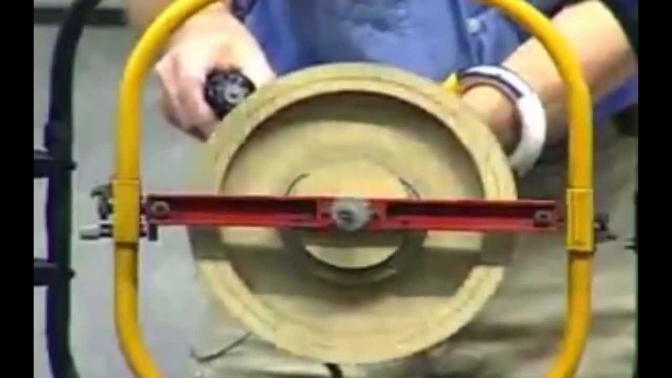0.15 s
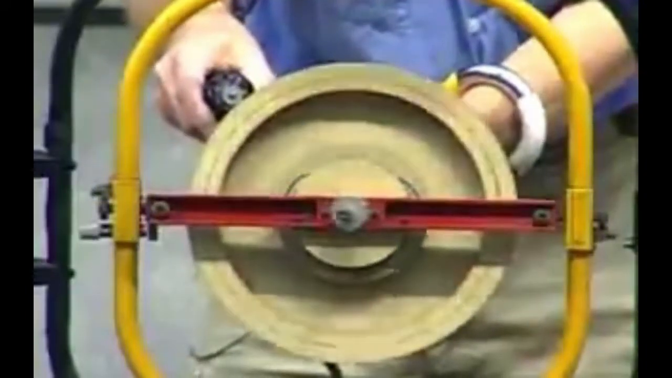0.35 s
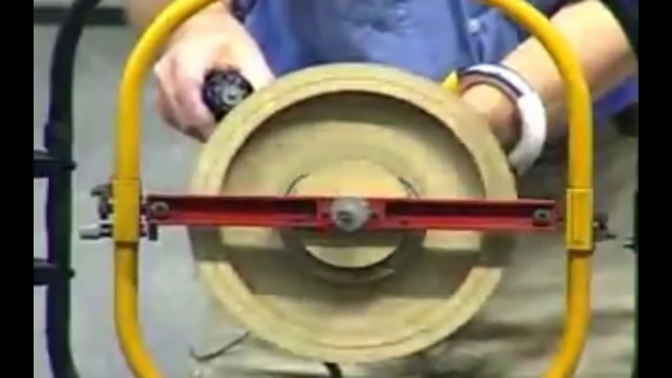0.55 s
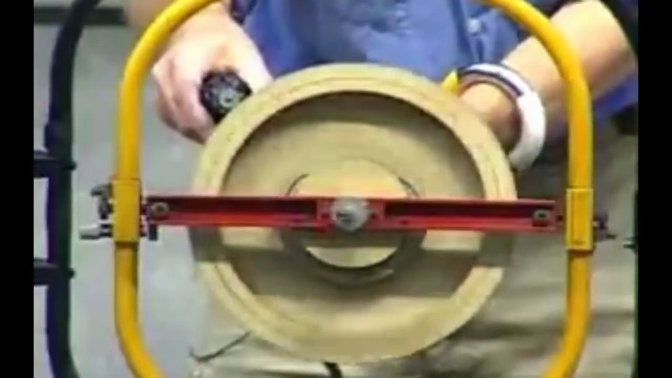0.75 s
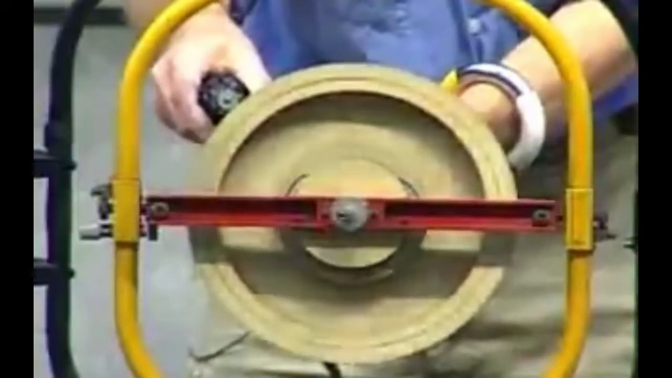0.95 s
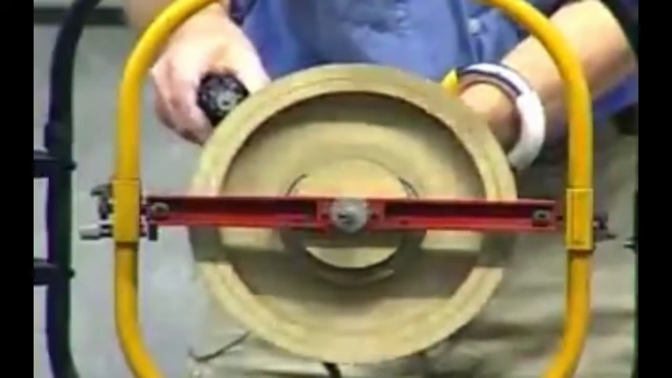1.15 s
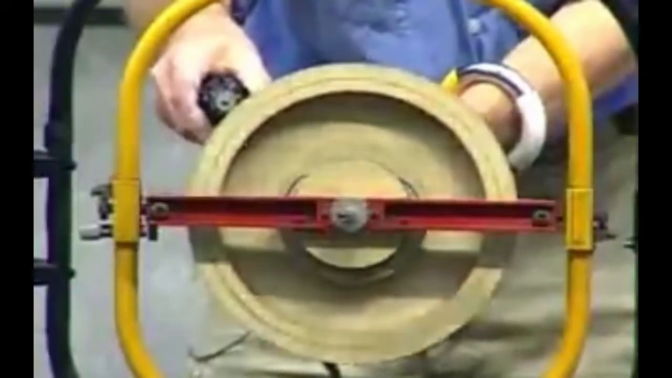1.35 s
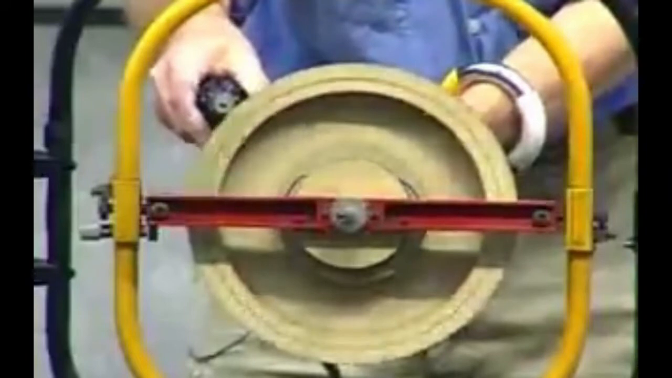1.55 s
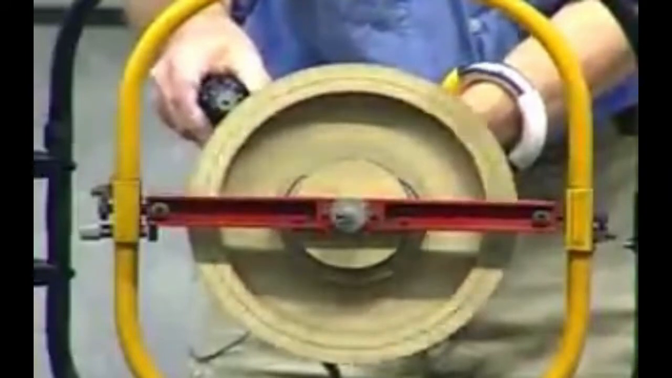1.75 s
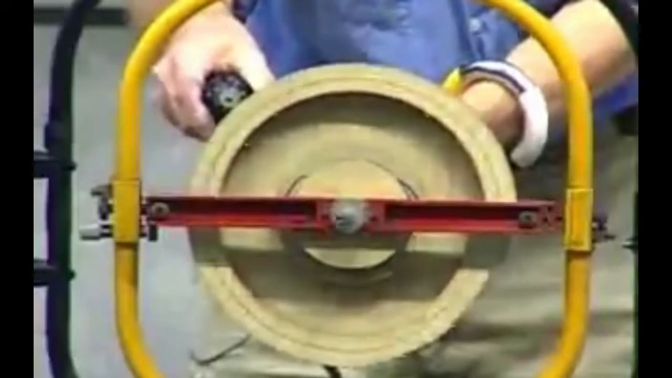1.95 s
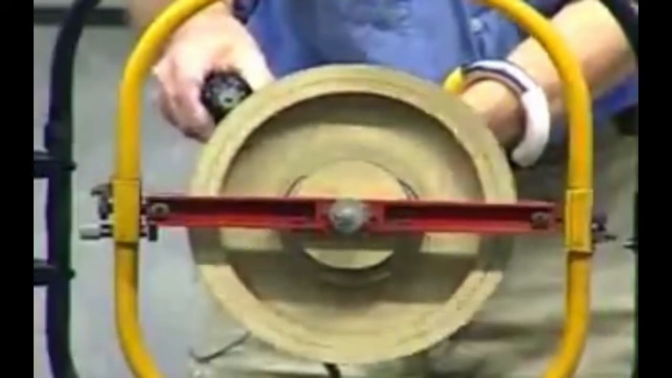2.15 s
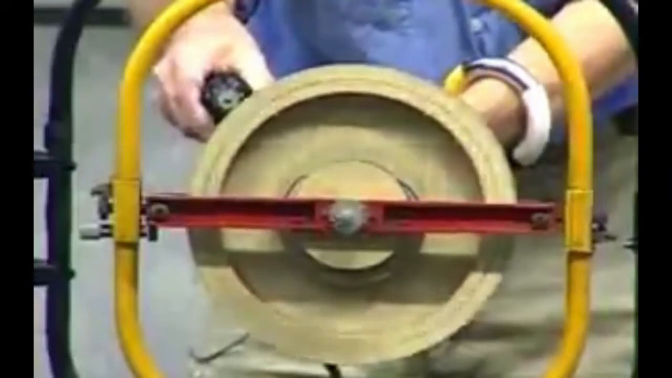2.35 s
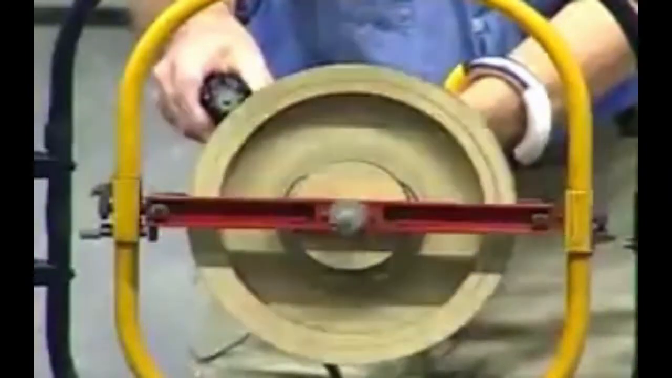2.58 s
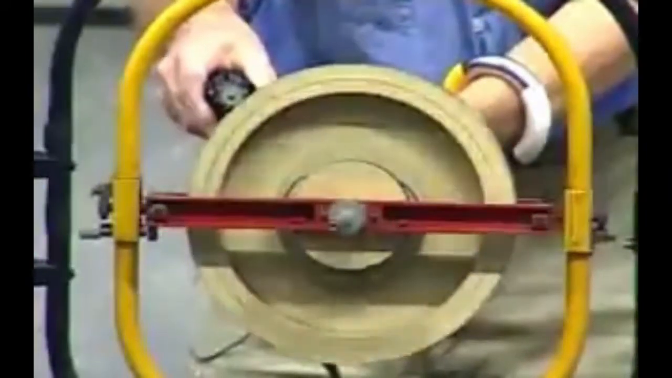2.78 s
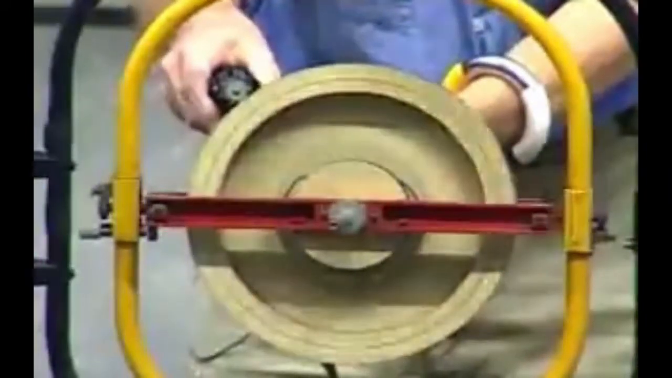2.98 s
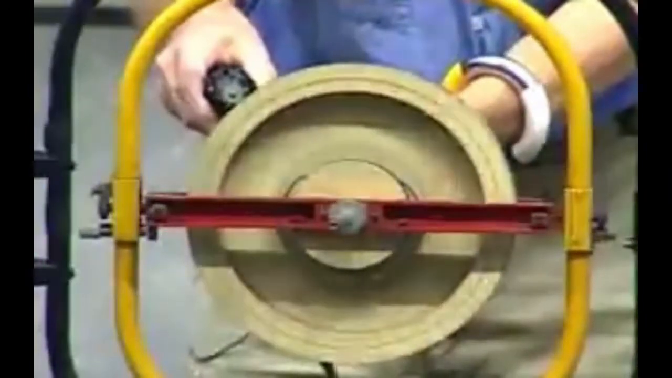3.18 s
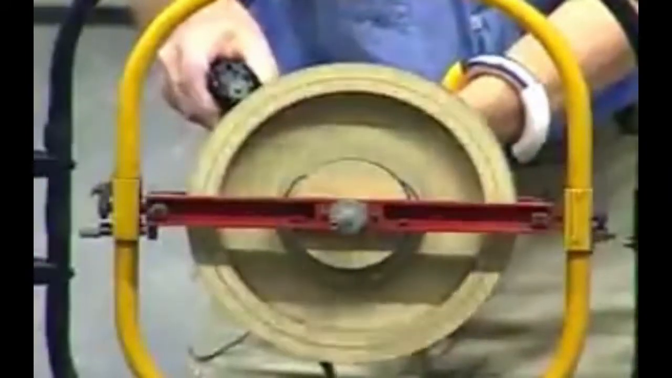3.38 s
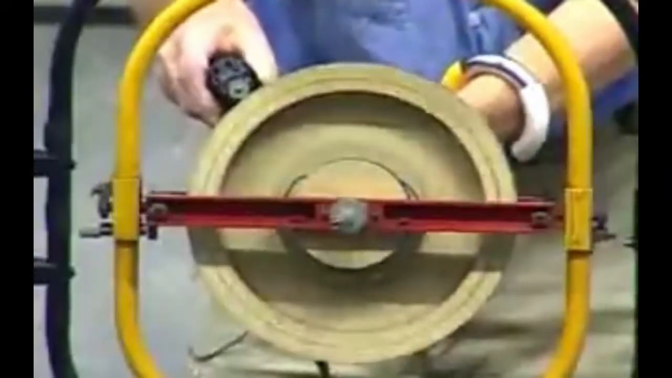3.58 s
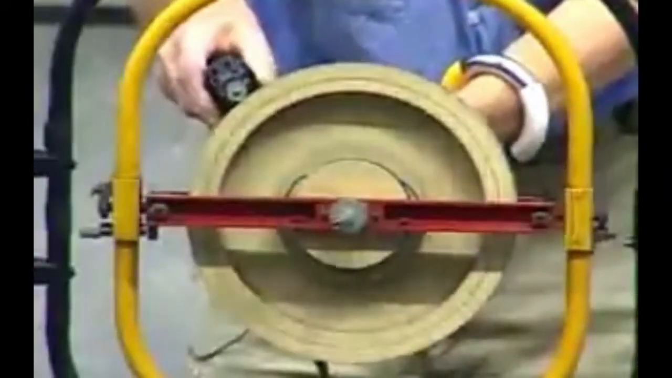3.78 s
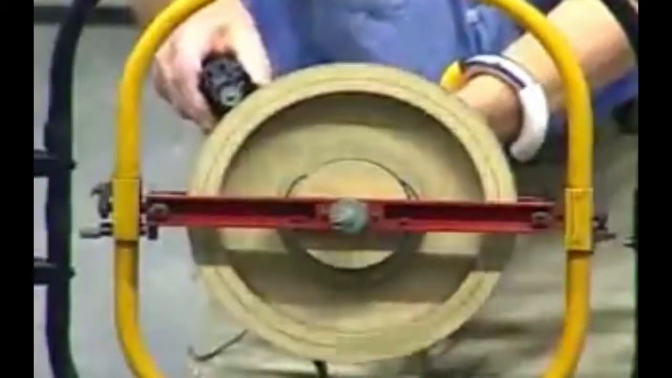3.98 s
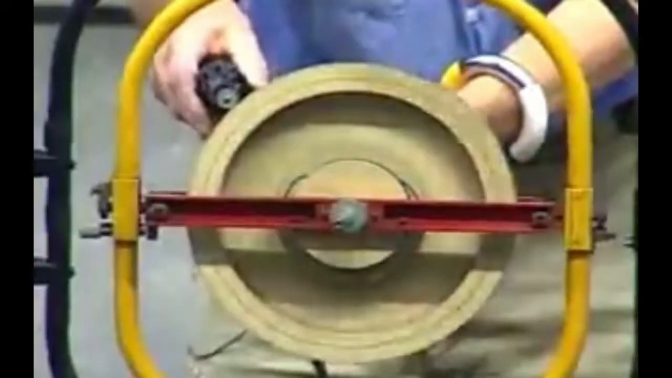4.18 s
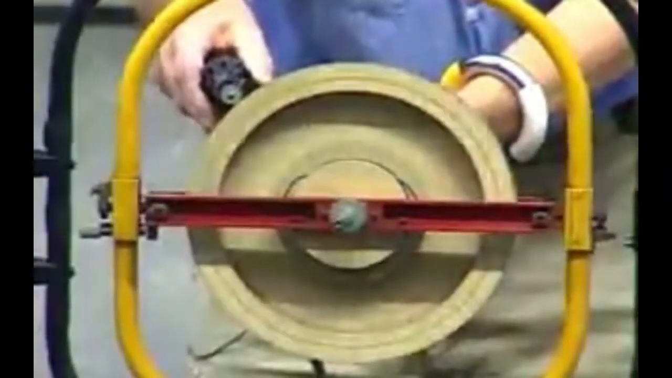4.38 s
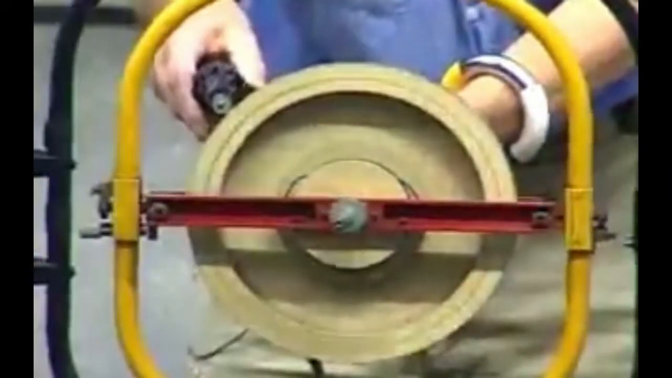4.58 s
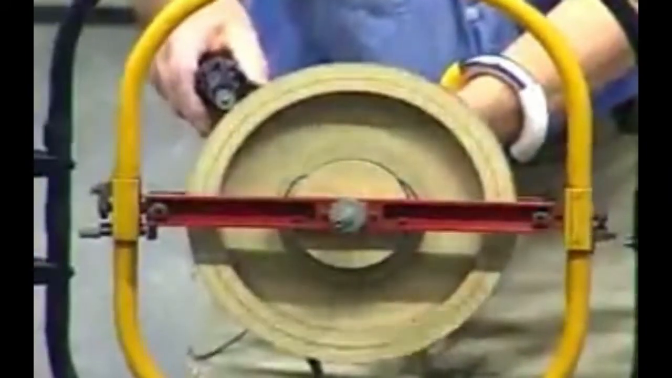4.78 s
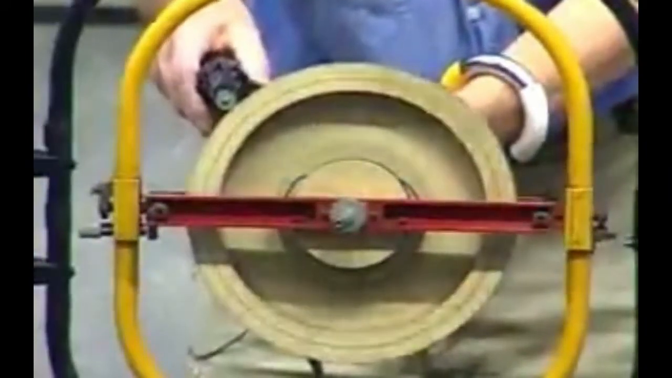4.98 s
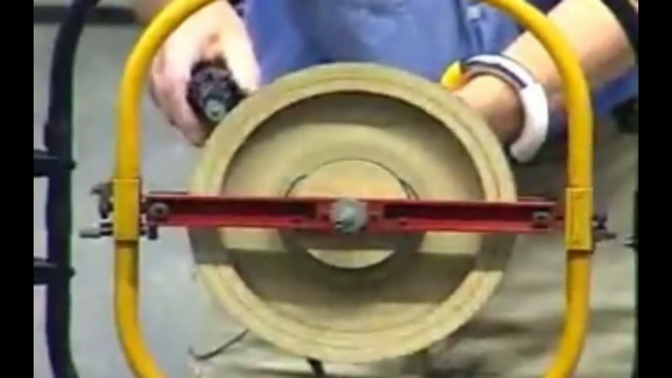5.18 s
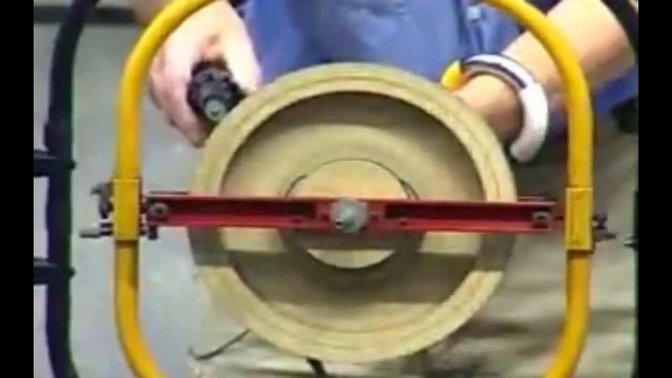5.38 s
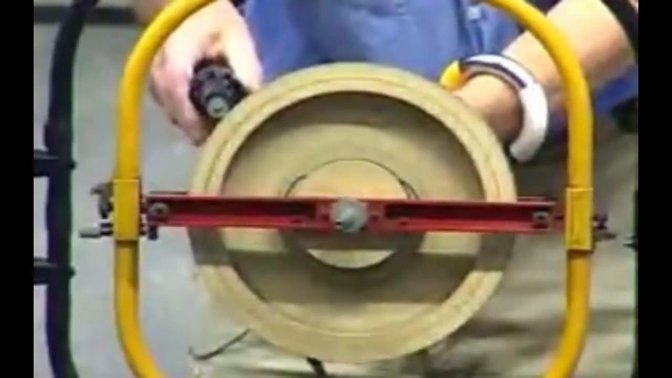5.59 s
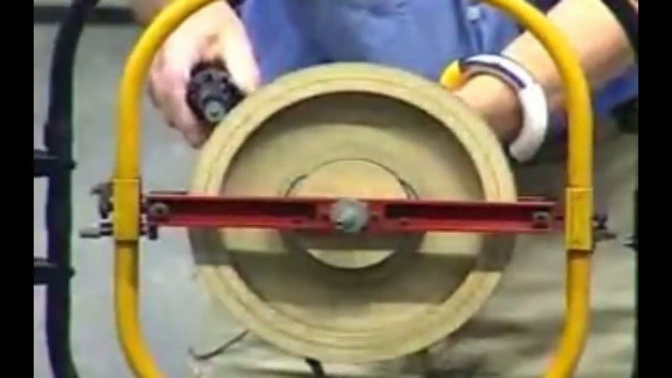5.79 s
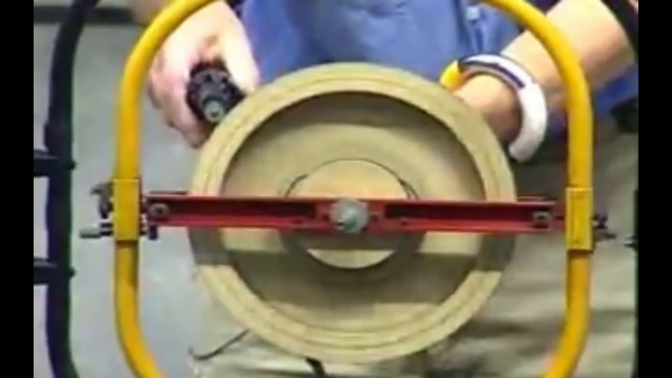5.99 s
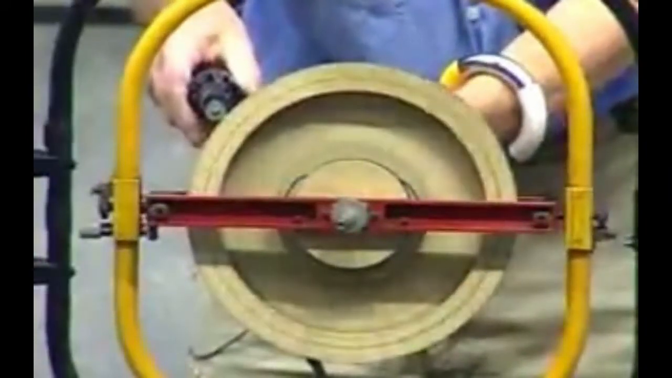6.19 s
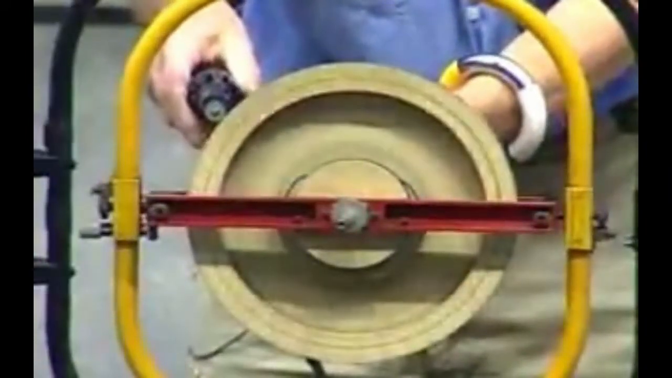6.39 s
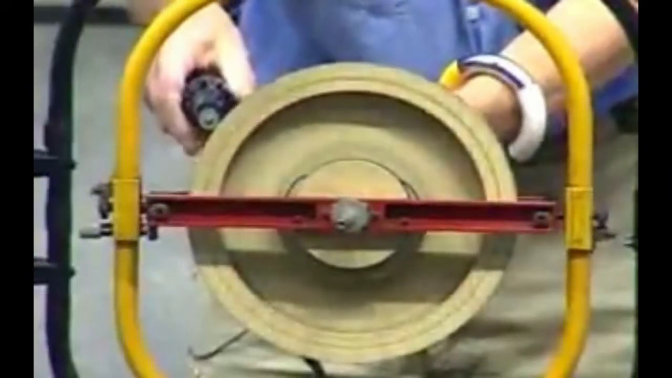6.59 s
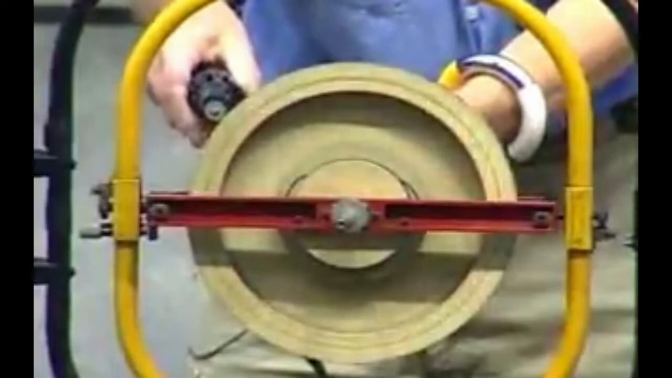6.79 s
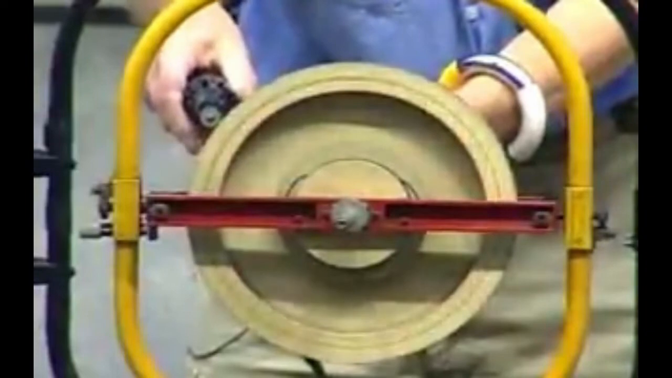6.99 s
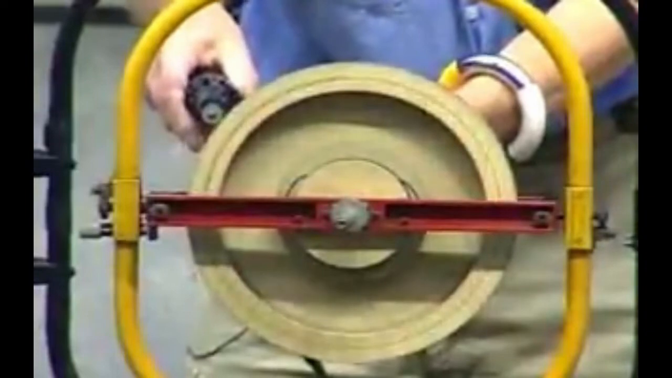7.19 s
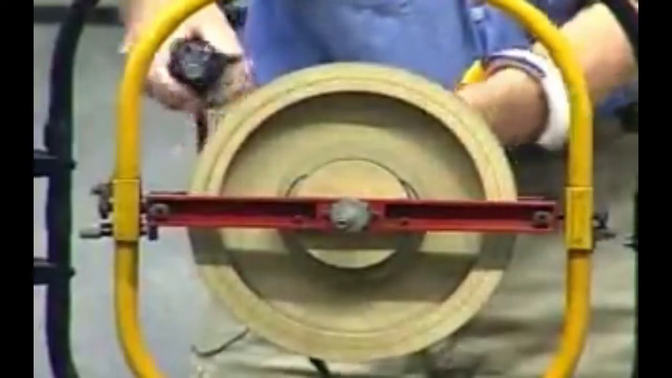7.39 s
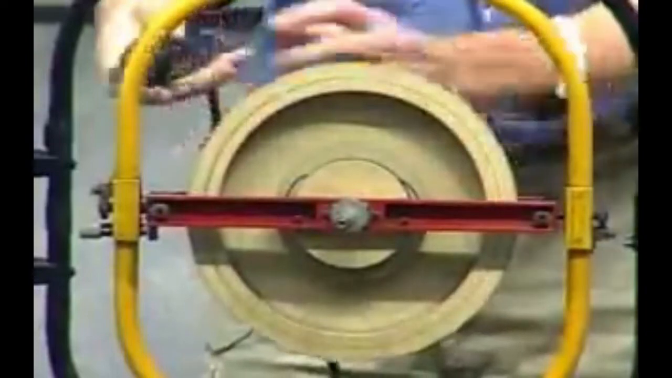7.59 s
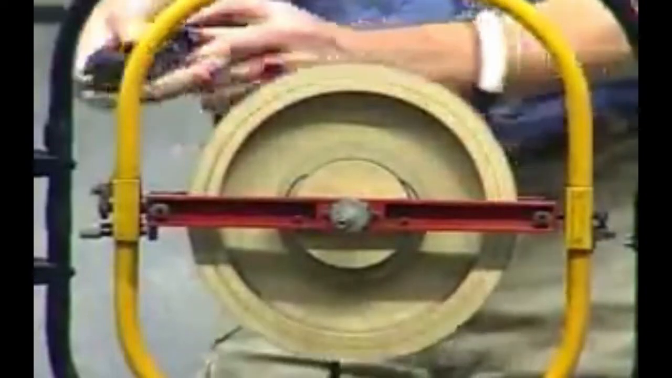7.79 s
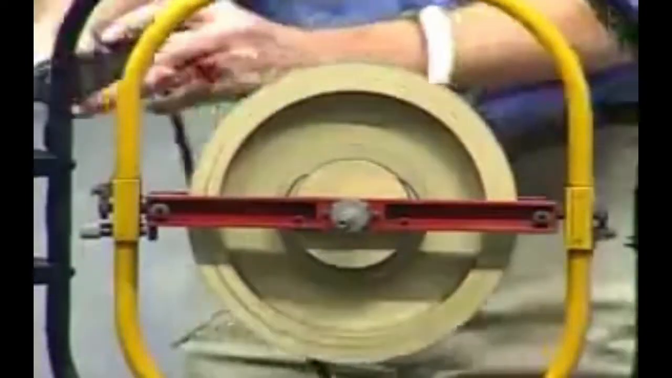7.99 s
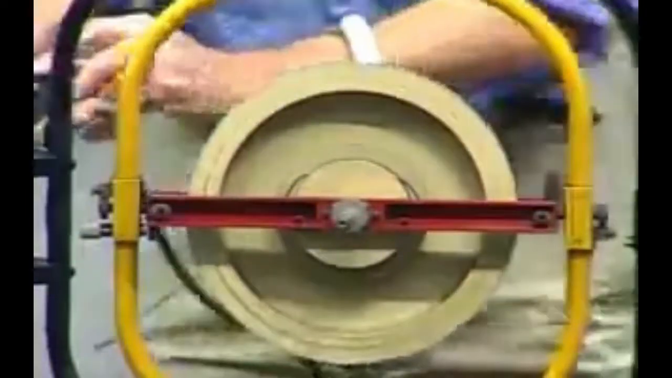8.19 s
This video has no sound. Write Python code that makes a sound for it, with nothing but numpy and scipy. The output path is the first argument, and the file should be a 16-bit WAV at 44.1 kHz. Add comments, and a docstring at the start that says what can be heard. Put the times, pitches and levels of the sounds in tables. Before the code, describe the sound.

A small electric motor rubs a heavy metal wheel with bright hissing scrape and ringing squeals, falters briefly, then lifts off and whirs freely.

```python
"""A small hand-held electric motor, pressed against the rim of a heavy gyroscope wheel, spins it up.
Its shaft harmonics whir lower under load; the slipping drive tip makes coloured friction noise: scrape and hiss.
The rubbed wheel rings in split modes that beat, with weaker rings of wheel and frame, squeals and dry ticks.
The contact nearly lets go around 3 s; near 7.5 s the motor is lifted off and runs free, hissing softly,
while the wheel rings out by exponential decay. A low room rumble and mains hum lie beneath."""
import sys
import numpy as np
from scipy import signal
from scipy.fft import rfft, irfft, next_fast_len
from scipy.io import wavfile
from scipy.ndimage import uniform_filter1d, map_coordinates

SR = 44100
rng = np.random.default_rng(int(sys.argv[2]) if len(sys.argv) > 2 else 0)


def store_wav(level_fs):
    """Save 16-bit WAV to argv[1]."""
    pcm = np.round(np.clip(np.atleast_2d(level_fs), -1, 1) * 32767)
    wavfile.write(sys.argv[1], SR, pcm.T.astype(np.int16))


N = 363825

# Motor speed. Each row: time in seconds, shaft speed in Hz.
SHAFT_SPEED = [(0.0, 226.7), (0.23, 230.1), (1.28, 215.8), (1.45, 220.7), (1.58, 214), (2.0, 218.6),
               (2.11, 222.1), (2.46, 223.5), (2.96, 199.9), (3.33, 209.2), (3.49, 230.4), (3.68, 244),
               (4.07, 253.7), (4.32, 235), (4.55, 258.2), (4.69, 246), (4.92, 252), (5.01, 269.6),
               (5.19, 282.7), (5.24, 254.5), (5.26, 252.1), (5.38, 248.5), (5.68, 264.4), (5.74, 276.4),
               (6.52, 272.3), (6.73, 239.6), (7.01, 263.2), (7.19, 238.3), (7.35, 251.2), (7.51, 291.2),
               (7.76, 302.7), (8.25, 304.8)]
# Drive tip on the rim. Each row: time in seconds, friction level in dB,
# level of the dull scrape in dB over its balance with the hiss.
FRICTION = [(0, -40.5, -1), (0.25, -40.5, 0), (0.82, -41.0, -1), (1.05, -43, 1), (1.9, -43.0, 1),
            (2.17, -41.5, 1), (2.55, -41.5, 1.0), (2.87, -45.5, -1.5), (2.97, -48.5, -1.5),
            (3.25, -50.5, 3.5), (3.38, -43, 0.5), (3.65, -41, 0), (4.25, -42.5, 0.0), (4.6, -40.5, 1.0),
            (5.02, -40.5, 1), (5.17, -40.5, 1.5), (5.35, -42.5, 1), (5.55, -40.5, -0.5), (6.5, -40.5, 0.5),
            (6.8, -42.0, 1), (7.02, -40.5, 1), (7.4, -43, 2)]
# Wheel speed. Each row: time in seconds, turns per second.
WHEEL_SPIN = [(0, 15.3), (2, 17.6), (4, 19.6), (6, 20.8), (7.4, 21.6), (8.25, 21.5)]
# Contact force. Each row: time in seconds, pressure on the rim from 0 (light) to 1 (hard).
PRESSURE = [(0, 0.12), (3.35, 0.072), (3.7, 0.45), (4.1, 0.57), (4.8, 0.89), (5.05, 1), (6.45, 0.95),
            (6.7, 0.76), (7.4, 0.8)]
# Colour of the dull scrape. Each row: frequency in Hz, relative density in dB per Hz.
SCRAPE_COLOUR = [(100, -29), (400, -16), (600, -14.5), (900, -10), (1300, -4), (2000, -5.5), (2550, -6),
                 (3200, 0.5), (3900, 4), (4700, 0.5), (6000, -3), (8000, -28), (12000, -36), (13000, -64)]
# Colour of the bright hiss. Each row: frequency in Hz, relative density in dB per Hz.
HISS_COLOUR = [(1000, -11.5), (3000, -15), (5500, 1.5), (7000, 4), (8200, 1.5), (9500, 3.5), (10400, 4.5),
               (11300, 5.5), (12300, 1.5), (12750, -2), (13150, -28), (14400, -14.5), (15600, -15),
               (16500, -28)]

LIFT, RELEASE_S = 7.42, 0.068  # (s) the tip starts to leave the rim; time it takes to leave
FIRM_DB = -41.5  # friction level of a firm, even contact
# Each line: dB at firm contact under light pressure, dB per dB of friction, dB added when pressed hard
SCRAPE_DB, SCRAPE_GROWS, SCRAPE_PRESS_DB = -42, 0.98, 0
HISS_DB, HISS_GROWS, HISS_PRESS_DB = -39, 0.93, -0.26
WHIR_DB, WHIR_GROWS, WHIR_PRESS_DB = -44, 0.37, -0.5


def amp(db):
    """Amplitude ratio of a level in dB: twenty decibels to a factor of ten."""
    return 10 ** (np.asarray(db) / 20)


def unit(x):
    """Normalization to a root-mean-square of 1."""
    return x / np.sqrt(np.mean(np.abs(x) ** 2) + 1e-20)


def curves(rows):
    """Linear interpolation in time: one value per sample for each column after the time."""
    s, *cols = np.transpose(rows)
    t = np.arange(N) / SR
    return [np.interp(t, s, c) for c in cols]


def wobble(rate):
    """Band-limited random fluctuation: a smooth curve of rms 1 through random knots, rate a second."""
    knots = rng.standard_normal(int(N * rate / SR) + 4)
    return unit(map_coordinates(knots, [np.arange(N) * rate / SR], order=2))


def angle(hz):
    """Phase in radians as the running integral of a steady or gliding frequency."""
    return 2 * np.pi * np.cumsum(hz * np.ones(N)) / SR


def filtered(x, response):
    """Linear filtering: the spectrum of x times a response of frequency."""
    m = next_fast_len(N + 8192)
    return irfft(rfft(x, m) * response(np.fft.rfftfreq(m, 1 / SR)), m)[:N]


def noise(spectrum, patchy_db):
    """Coloured noise of rms 1: random gain patches in time and frequency, then a spectral envelope."""
    z = signal.stft(rng.standard_normal(N), nperseg=512)[2]
    field = rng.standard_normal(z.shape)
    field = uniform_filter1d(field, size=4, axis=0)
    field = uniform_filter1d(field, size=14, axis=1)
    patchy = signal.istft(z * amp(patchy_db * unit(field)), nperseg=512)[1][:N]
    f, db = np.transpose(spectrum)
    return unit(filtered(patchy, lambda hz: amp(np.interp(np.log(hz + 1), np.log(f), db))))


def swing(width, steady):
    """Narrow-band excitation: complex amplitude whose strength and phase wander as fast as width (Hz) allows."""
    count = 16384
    offset = np.fft.fftfreq(count, N / SR / count)
    kicks = rng.standard_normal((2, count))
    resonance = 1 / (1 + 1j * offset / (.75 * width)) ** 2
    z = np.fft.ifft((kicks[0] + 1j * kicks[1]) * resonance)
    z = unit(z / np.abs(z) ** np.clip(steady, 0, 1))  # friction limits the swing
    return np.interp(np.linspace(0, count - 1, N), np.arange(count), z)


def swell(s, length):
    """Raised-cosine envelope: a smooth hump of height 1 centred on s."""
    return np.cos(np.pi * np.clip((np.arange(N) / SR - s) / length, -.5, .5)) ** 2


def contact():
    """Contact state of the tip: 1 on the rim, falling linearly to 0 as it is lifted."""
    return np.clip(1 - (np.arange(N) / SR - LIFT) / RELEASE_S, 0, 1)


def driven(firm_db, grows, press_db):
    """Friction drive: level in dB of a sound that grows with the friction and shifts with the pressure."""
    return firm_db + grows * (curves(FRICTION)[0] - FIRM_DB) + press_db * curves(PRESSURE)[0]


def scrape_level():
    """Friction drive of the dull scrape: level in dB, plus how roughly the tip bites."""
    return driven(SCRAPE_DB, SCRAPE_GROWS, SCRAPE_PRESS_DB) + curves(FRICTION)[1]


def room():
    """Background: coloured noise as the low rumble of the room, with pure tones of mains hum."""
    # Rumble colour. Each row: frequency in Hz, relative density in dB per Hz.
    rumble_colour = [(15, -9.5), (31, 3.5), (45, -4.5), (100, -6.5), (300, -12), (600, -9.5), (1500, -9.5),
                     (8000, -30)]
    # Mains hum. Each row: frequency in Hz, rms level in dB.
    hum_tones = [(60, -75.5), (180, -73.5)]
    hum = sum(amp(db) * np.sqrt(2) * np.sin(angle(hz)) for hz, db in hum_tones)
    return amp(-61.5) * noise(rumble_colour, patchy_db=2.5) + hum


def ticks():
    """Impulsive excitation: the tip catches on the rim in short dry bursts of decaying noise."""
    # Catches of the tip. Each row: start in seconds, strength in dB relative to one another.
    catches = [(4.1482, -25), (6.9, -26), (7.001, -25), (7.0564, -24), (7.0723, -25)]
    t = np.arange(SR // 50) / SR
    bursts = np.zeros(N)
    for s, db in catches:
        decay_db = 60 * t / .004  # 60 dB in 4 ms
        bursts[round(s * SR):][:len(t)] += amp(db - 6 - decay_db)
    return filtered(bursts * rng.standard_normal(N), lambda hz: (hz > 1500) & (hz < 12500))


def free_hiss():
    """Broadband noise of the free motor: off the rim it hisses softly, swelling as it is swung aside."""
    # Swells of the hiss. Each row: time of the height in seconds, length in seconds, lift in dB.
    swings_aside = [(7.769, 0.32, 3), (8.084, 0.36, 3.5)]
    bright_db, dull_db = -46, -51.5  # before the swells
    swell_db = sum(db * swell(s, length) for s, length, db in swings_aside)
    bright = amp(bright_db) * noise(HISS_COLOUR, patchy_db=1.5)
    dull = amp(dull_db) * noise(SCRAPE_COLOUR, patchy_db=4.5)
    return (1 - contact()) * amp(swell_db) * (bright + dull)


def frame():
    """Forced resonance: weaker rings swell and fade as the tip wanders over the rim and need a firm scrape."""
    # Weaker rings of wheel and frame. Each entry: frequency in Hz.
    ring_hz = [2700, 2933, 4040, 4180, 4322, 5600, 7270, 7719, 9160, 10350, 11183, 11391, 11568, 15460]
    # The same rings. Each row: width in Hz, relative level in dB pressed lightly, the same pressed hard.
    ring_levels = [(51, -5, -1), (43.2, -1.5, 0), (64.815, 0, -11), (54, -24, -7), (15.9, 3, -0.5),
                   (70, 2, -19), (110, 3, -6), (18, -1.5, -16), (60, -17, 9.5), (231.48, 0, -4.5),
                   (26, -16, 1), (35, 1, -15), (28, 1, 5.5), (34, -19, -13)]
    press, = curves(PRESSURE)
    scrape_db = scrape_level()
    rings = np.zeros(N)
    for hz, (width, light_db, hard_db) in zip(ring_hz, ring_levels):
        level_db = light_db + press * (hard_db - light_db) + 1.5 * wobble(7)
        rings += amp(level_db) * np.real(swing(width, steady=0.028) * np.exp(1j * angle(hz)))
    firm = 1 / (1 + amp(2.7 * (-47 - scrape_db)))  # soft threshold at a scrape of -47 dB
    return amp(scrape_db - 0.03) * firm * contact() * unit(rings)


def wheel():
    """Mode splitting by rotation: waves with and against the spin part, beating faster as the wheel speeds up."""
    # Pitch of the wheel modes. Each row: frequency in Hz, side wave shift in Hz per wheel turn a second.
    mode_pitch = [(2274, 2), (3328, 2), (3768, 2.1), (5137, 4), (6180, 2), (6902, 3.1), (8916, 4.4)]
    # Ring of the same modes. Each row: width in Hz, damping in dB per second once the tip is off,
    # relative levels in dB of the backward, standing and forward wave.
    mode_ring = [(9.35, 14, 1, -12, 5), (11.5, 144, -24, -6, -3), (28, 175, 6, -10, 13),
                 (12.3, 34, 6, 12.5, 10), (28, 116, -20, 2, -18), (29.8, 120, -8, -18, 1),
                 (27.7, 246, 8, 1, 1.5)]
    # Friction drive of the same modes. Each row: level in dB at firm contact pressed lightly,
    # the same pressed hard, growth in dB per dB of friction.
    mode_drive = [(-42.5, -45, 2.1), (-48, -50, 1.3), (-49.5, -49, 2), (-38.5, -48.5, 1), (-53, -61, 1.2),
                  (-43.5, -56, .9), (-39, -40, 1.15)]
    # The tip catches a mode, which sings out. Each row: time of the height in seconds, length in seconds,
    # mode frequency in Hz, lift in dB.
    squeals = [(0.273, 0.27, 2274, 7), (.36, 0.13, 5137, 5), (.78, 0.88, 2274, 3), (.82, .12, 6902, 7),
               (1.56, 0.18, 5137, 6), (1.726, 0.25, 8916, 5), (1.97, 0.22, 5137, 7.5),
               (2.159, 0.2, 2274, 9.5), (2.15, .3, 3328, 9.5), (2.39, 0.4, 2274, 8.5),
               (2.41, 0.16, 5137, 8), (2.485, 0.11, 6902, 8), (2.54, .14, 3328, 8),
               (2.622, 0.18, 5137, 3.5), (2.72, .26, 6180, 9), (3.415, .22, 5137, 3.5),
               (3.46, 0.34, 6180, 11), (3.7, 0.15, 3328, 6.5), (3.75, 0.23, 5137, 3), (4.47, 0.28, 5137, 8),
               (4.79, .14, 8916, 5), (5.12, .22, 8916, 6.5), (5.189, 0.23, 3328, 12),
               (5.573, .12, 3328, 11), (5.9, 0.13, 3768, 8), (5.969, .24, 2274, 6), (6.197, .2, 5137, 7.5),
               (6.36, .14, 3328, 7), (7.433, 0.62, 2274, 10.5), (7.44, 0.31, 5137, 9.5)]
    own_swing = .45  # each wave's own swing against the swing that all three share
    catch_db = -48  # below this friction level the modes barely catch
    turn = angle(curves(WHEEL_SPIN)[0])
    coasting = np.maximum(np.arange(N) / SR - LIFT, 0)  # seconds since the lift
    caught = 1 / (1 + amp(4.9 * (catch_db - curves(FRICTION)[0])))
    out = np.zeros(N)
    for pitch, ring, drive in zip(mode_pitch, mode_ring, mode_drive):
        hz, shift = pitch
        width, damping, *wave_db = ring
        light_db, hard_db, grows = drive
        common = swing(width, steady=0.84)  # one contact feeds all three waves
        waves = 0
        for way, db in zip((-1, 0, 1), wave_db):
            # running waves are out of step with the standing one: shallow beats
            phase = way * shift * turn + abs(way) * np.pi / 3
            strength = common + own_swing * swing(1.5 * width, steady=0.53)
            waves = waves + amp(db) * strength * np.exp(1j * phase)
        squeal_db = sum(db * swell(s, length) for s, length, mode_hz, db in squeals
                        if abs(mode_hz - hz) < hz / 20)
        wander_db = 0.94 * wobble(9)  # the drive drifts by chance
        level_db = driven(light_db, grows, hard_db - light_db) + squeal_db + wander_db
        tone = unit(np.real(waves * np.exp(1j * angle(hz))))
        out += amp(level_db - damping * coasting) * tone
    return caught * out


def rubbing(shaft):
    """Slip friction: gritty noise modulated by each turn of the tip, with a fainter, slower flutter."""
    flutter = angle(2 * curves(WHEEL_SPIN)[0])
    grit_db = 1.7 * wobble(900) + 0.94 * np.sin(shaft) + 0.79 * np.sin(flutter)
    grit = unit(amp(grit_db))
    scrape_db = scrape_level() + 1.1 * wobble(22)
    scrape = amp(scrape_db) * noise(SCRAPE_COLOUR, patchy_db=3.5)
    hiss_db = driven(HISS_DB, HISS_GROWS, HISS_PRESS_DB) + 1.1 * wobble(90)
    hiss = amp(hiss_db) * noise(HISS_COLOUR, patchy_db=1.5)
    return contact() * grit * (scrape + hiss)


def motor(shaft):
    """Harmonic source and resonator: load shifts the shaft orders, the housing lifts them; cooling air rushes."""
    # Shaft harmonics. Each row: multiple of the shaft speed, relative level in dB pressed lightly,
    # the same pressed hard, the same running free.
    orders = [(1, -35.5, -24, -18), (2, -32, -19.5, -17.5), (3, -23, -21.5, -11.5), (4, -24, -17.5, -21),
              (5, -22.5, -18.5, -10.5), (6, -16.5, -27, -11.5), (7, -9, -12, -9), (8, -28, -13.5, -3.5),
              (9, -15.5, -11, -10), (10, -24, -35, -13), (11, -34, -16, -15), (12, -21, -10.5, -11),
              (13, -35, -10, -13), (14, -22, -23, -13), (15, -17, -15, -13)]
    # Resonances of the motor housing. Each row: frequency in Hz, width in Hz, lift in dB.
    housing = [(535, 36, 1.5), (667, 28, 7.5), (1120, 48, 7), (1298, 87, 7), (2050, 130, 7)]
    # Colour of the cooling air. Each row: frequency in Hz, relative density in dB per Hz.
    air_colour = [(200, -26), (600, -11), (1000, -10), (1400, -2.5), (2100, 2), (2500, -4.5), (4000, -17),
                  (10000, -60)]
    free_whir_db, air_db = -51, -2.5  # running free; air before the common motor level
    press, touching = curves(PRESSURE)[0], contact()
    speed, = curves(SHAFT_SPEED)
    whir = np.zeros(N)
    for k, light_db, hard_db, free_db in orders:
        pressed_db = light_db + press * (hard_db - light_db)
        load_db = touching * pressed_db + (1 - touching) * free_db
        lift_db = sum(db / (1 + (2 * (k * speed - hz) / width) ** 2) for hz, width, db in housing)
        # radians: the shaft runs rougher when pressed
        judder = (0.12 + 0.14 * touching + 0.9 * press * touching) * wobble(40)
        phase = k * shaft + rng.uniform(0, 2 * np.pi) + judder
        whir += amp(load_db + lift_db + 2.53 * wobble(22)) * np.sqrt(2) * np.sin(phase)
    pressed_whir_db = driven(WHIR_DB, WHIR_GROWS, WHIR_PRESS_DB)
    level_db = touching * pressed_whir_db + (1 - touching) * free_whir_db
    return amp(level_db) * (whir + amp(air_db) * noise(air_colour, patchy_db=1.36))


def scene():
    """Superposition of all sources; one turning shaft times both the motor's whir and the rubbing."""
    shaft = angle(curves(SHAFT_SPEED)[0] * (1 + 0.001937 * wobble(30)))
    background = room() + ticks() + free_hiss()
    rings = frame() + wheel()
    return (background + rings + rubbing(shaft) + motor(shaft))[None]


def record(dry):
    """Band limitation: an ideal low-pass keeps nothing above 15750 Hz."""
    return filtered(dry[0], lambda hz: hz < 15750)[None]


dry = scene()
out = record(dry)
store_wav(out)
```